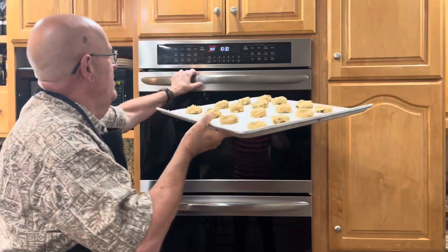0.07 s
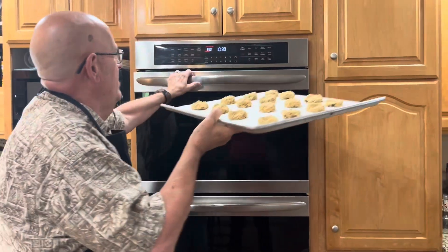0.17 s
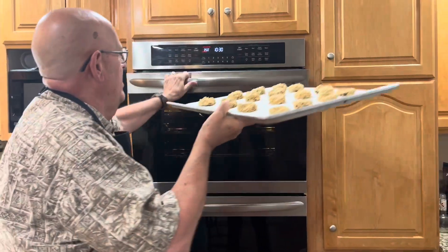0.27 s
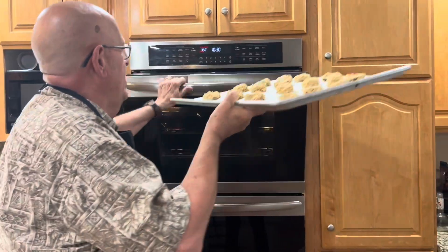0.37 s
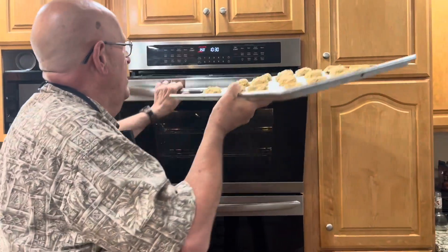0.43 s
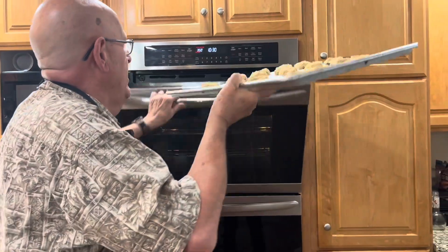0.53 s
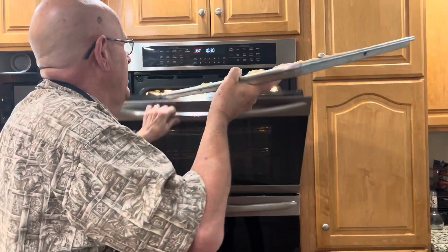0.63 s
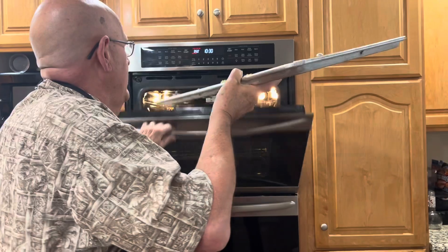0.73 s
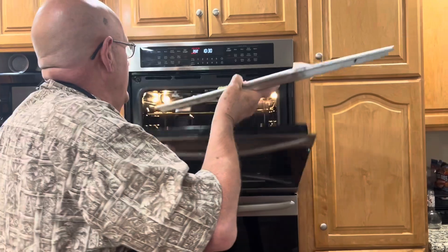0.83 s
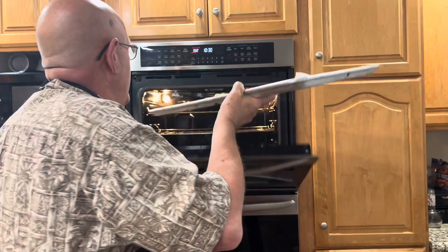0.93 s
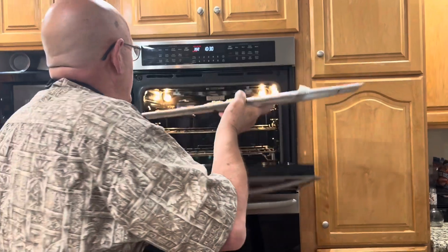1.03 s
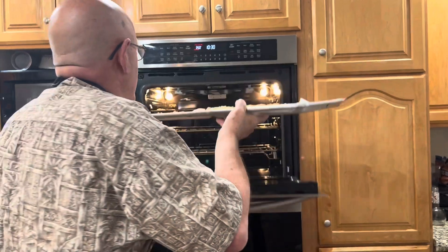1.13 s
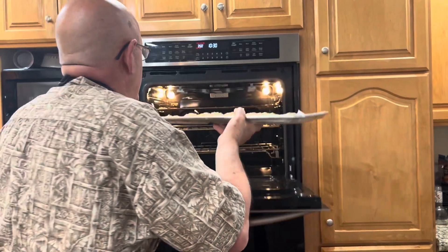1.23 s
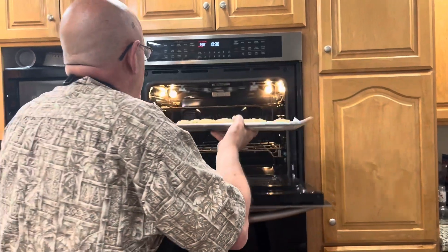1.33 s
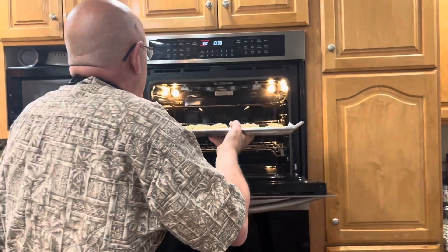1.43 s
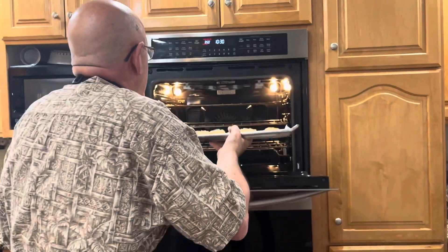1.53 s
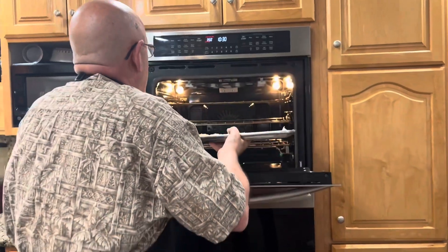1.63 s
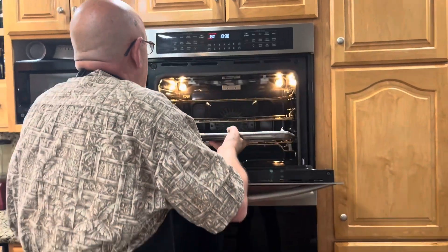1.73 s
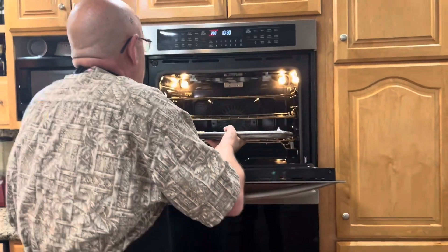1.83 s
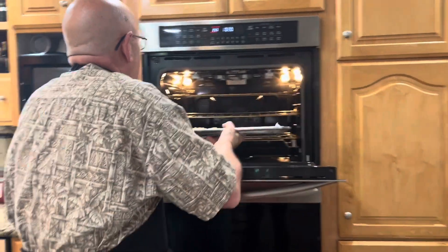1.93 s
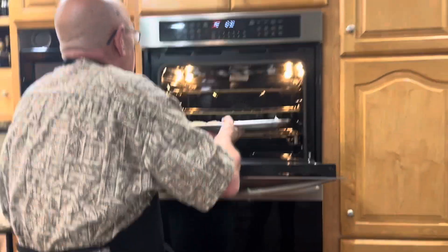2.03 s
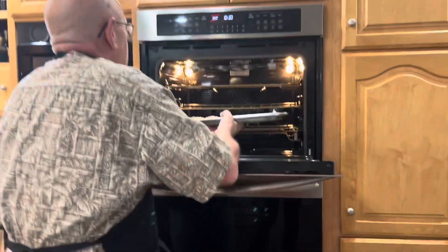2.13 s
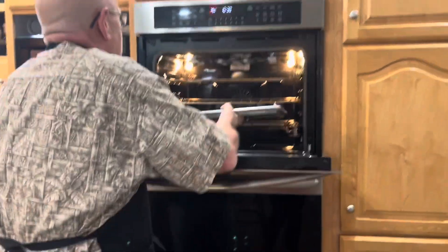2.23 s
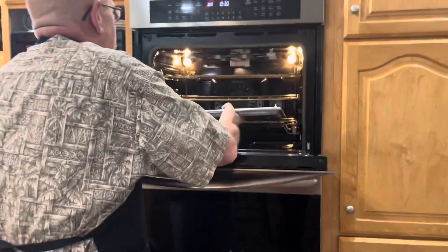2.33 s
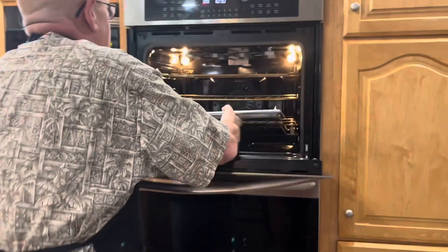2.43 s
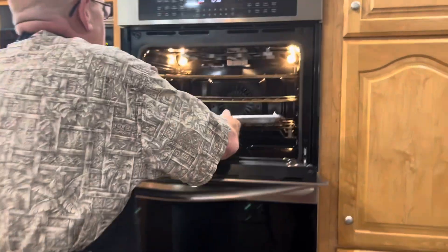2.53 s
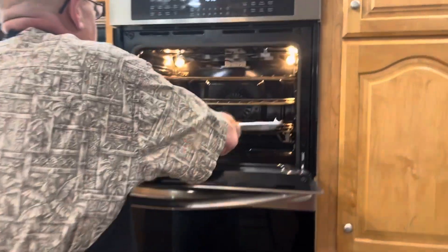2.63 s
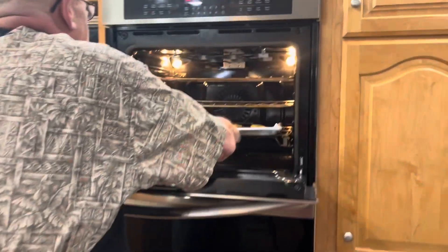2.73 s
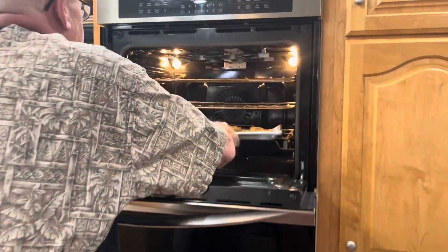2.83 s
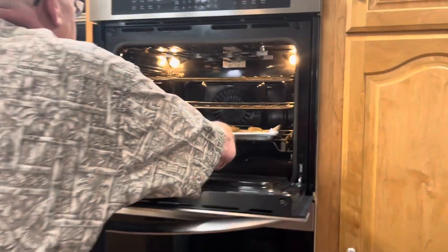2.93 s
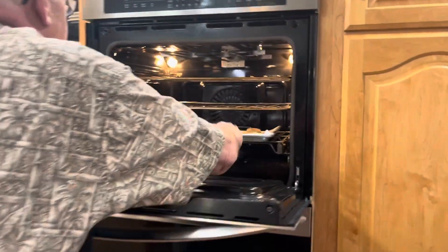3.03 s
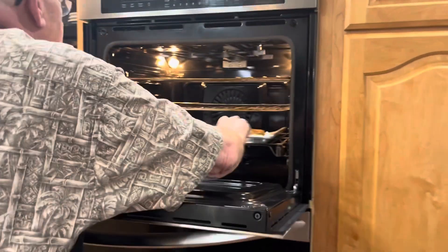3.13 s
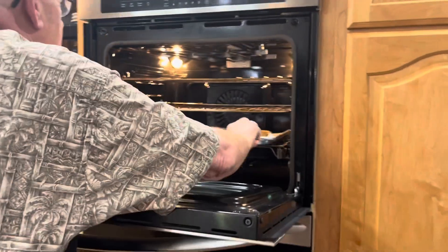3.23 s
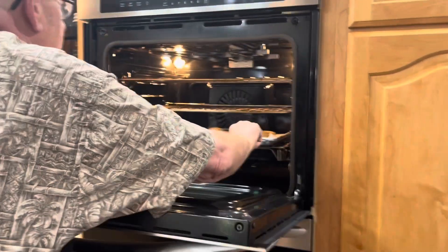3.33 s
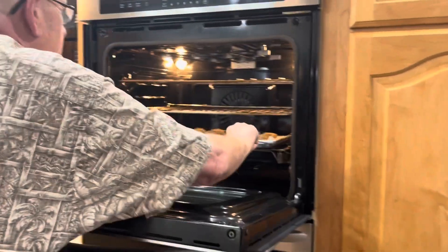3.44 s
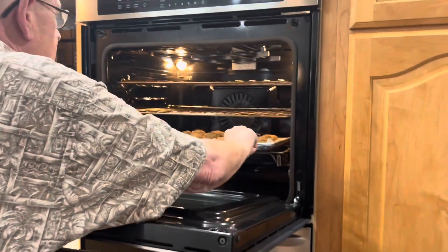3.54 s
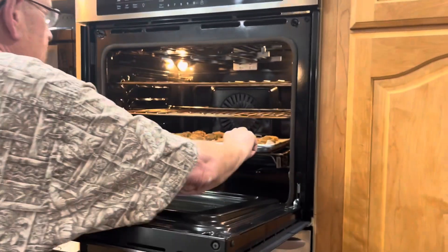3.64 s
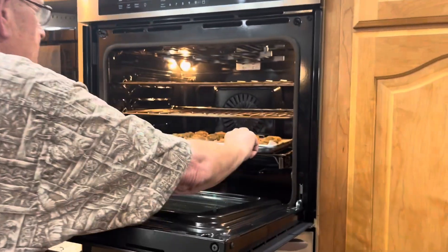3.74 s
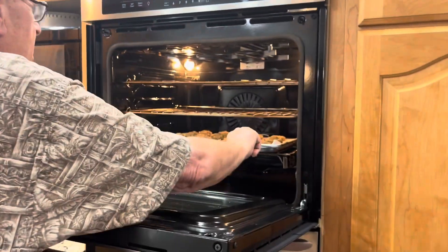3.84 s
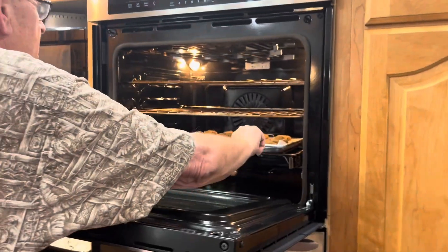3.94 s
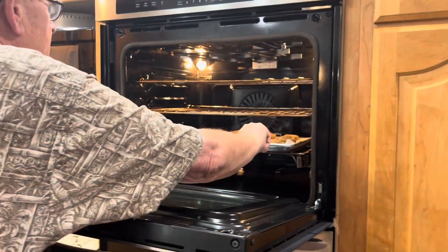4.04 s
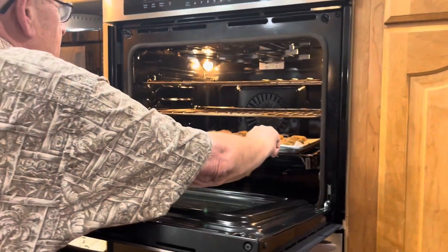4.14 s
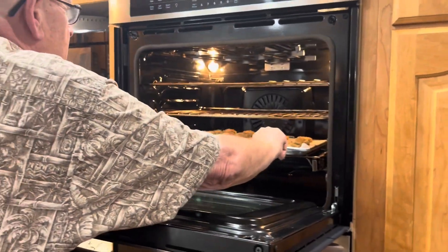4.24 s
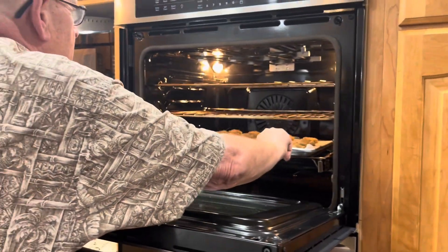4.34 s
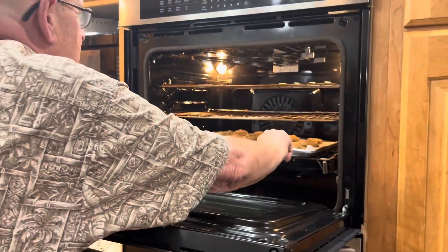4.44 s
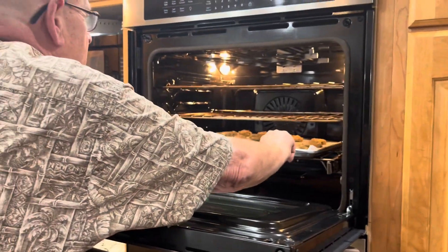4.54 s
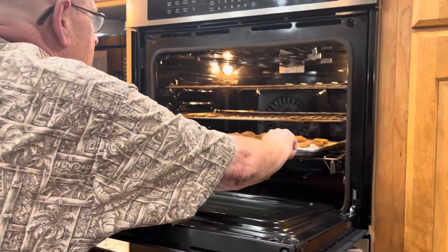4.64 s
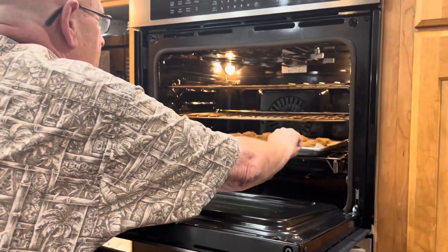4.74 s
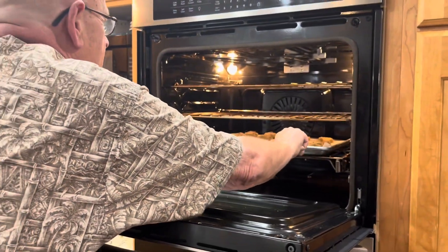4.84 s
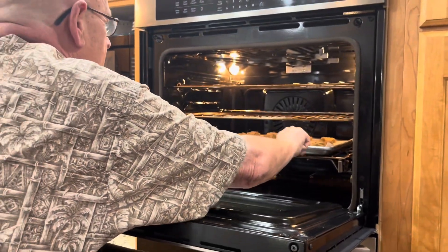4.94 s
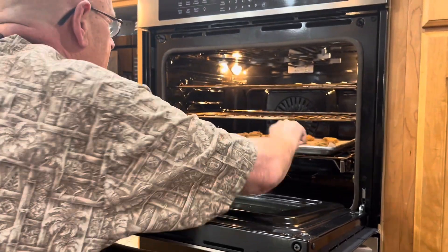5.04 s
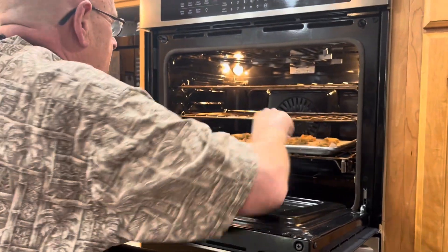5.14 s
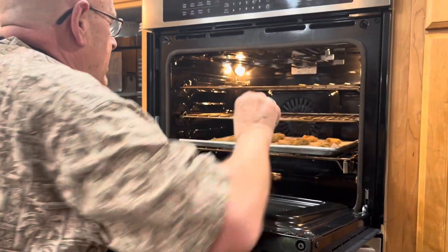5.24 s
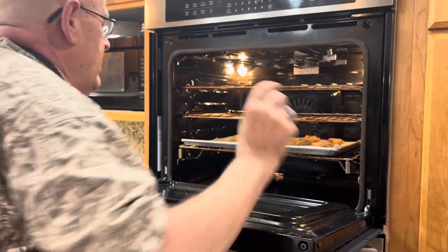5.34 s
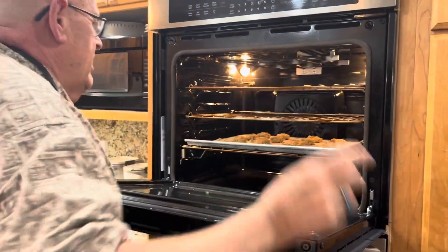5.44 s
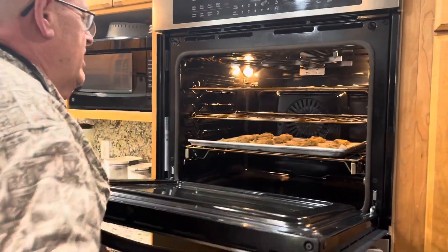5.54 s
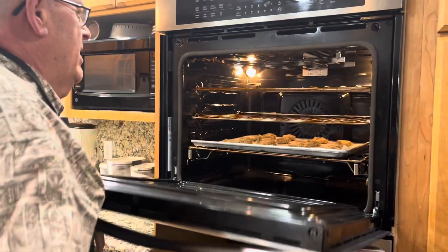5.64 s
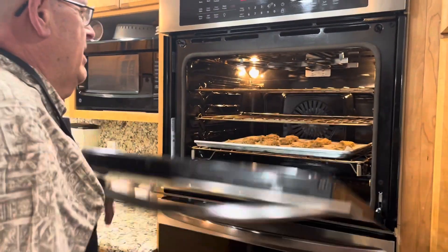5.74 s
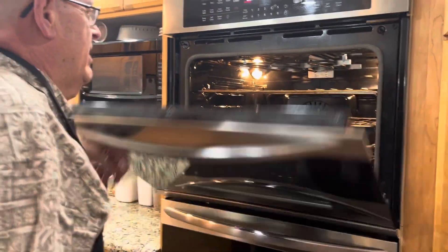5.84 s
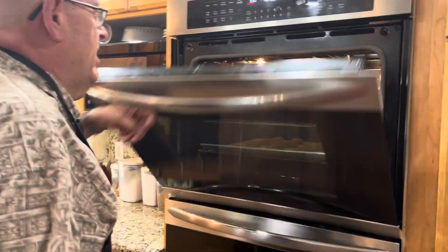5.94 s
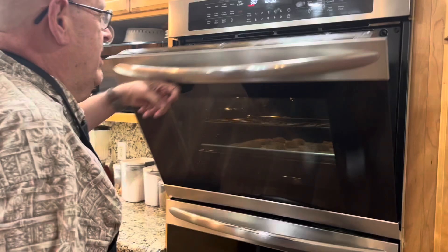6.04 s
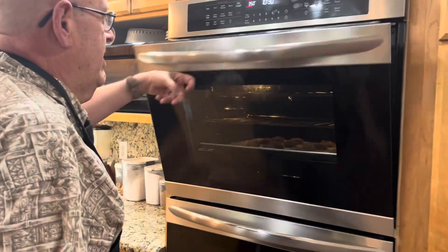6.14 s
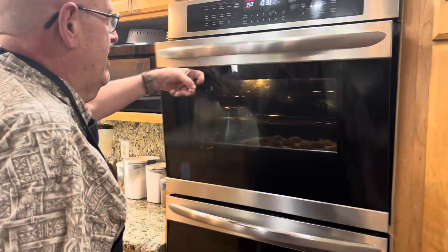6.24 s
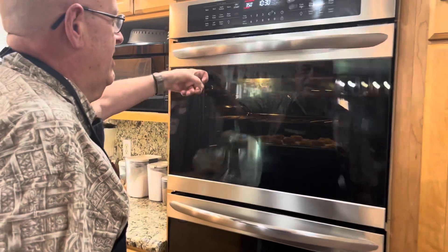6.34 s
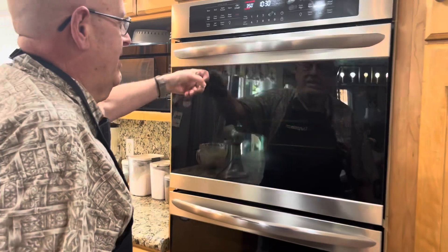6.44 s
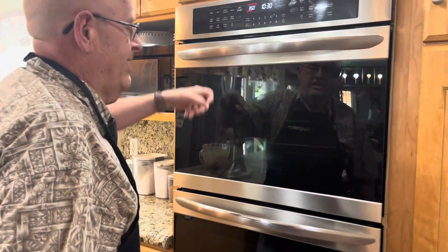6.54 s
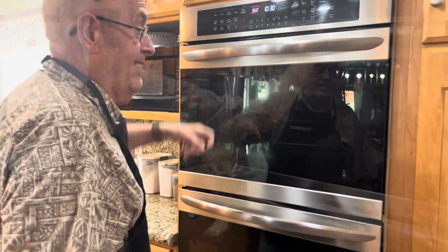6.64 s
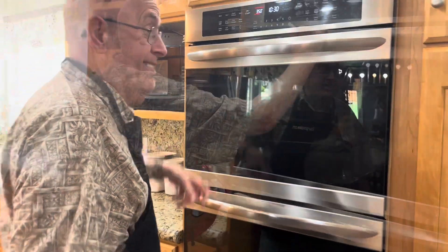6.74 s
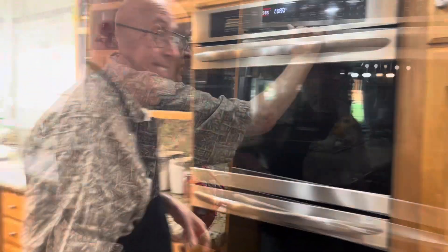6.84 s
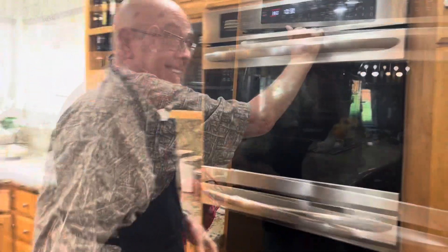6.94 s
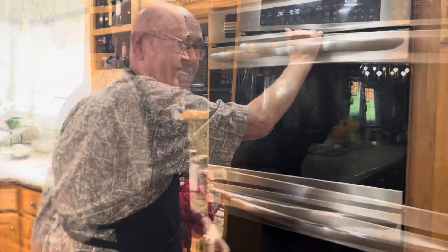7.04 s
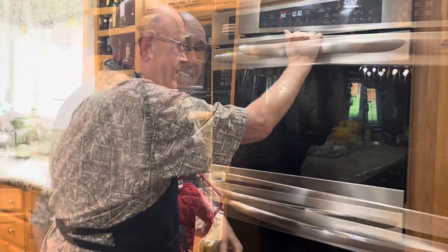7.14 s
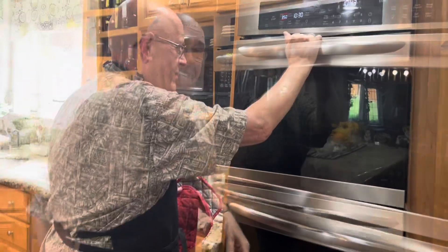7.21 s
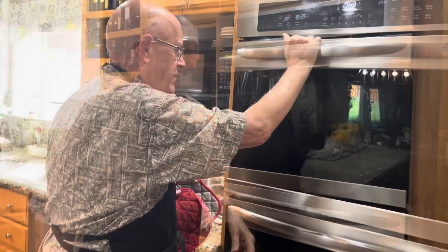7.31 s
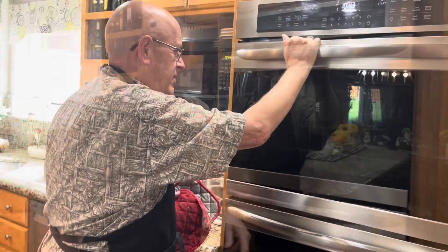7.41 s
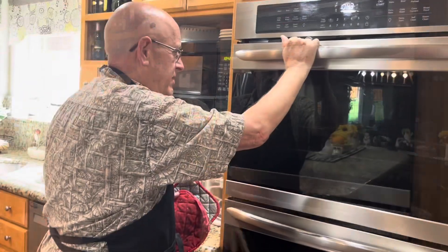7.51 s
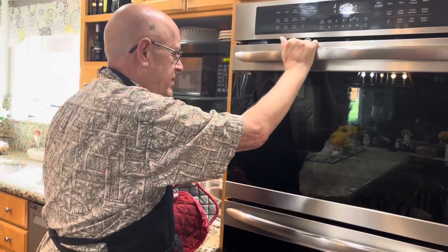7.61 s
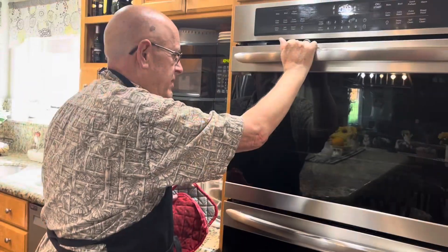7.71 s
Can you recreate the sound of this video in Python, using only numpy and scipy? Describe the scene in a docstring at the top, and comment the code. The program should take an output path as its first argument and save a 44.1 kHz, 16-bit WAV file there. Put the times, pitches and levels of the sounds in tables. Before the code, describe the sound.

A handheld stereo microphone moves nearer to a wall oven. The door is pulled down with faint hinge rumble, a thin spring ring and soft knocks. After a pause, a thin metal tray drops on the rack, rasping and clinking in bursts, with two tiny high squeaks and a loud final clank. The spring catches, the door slams heavily, racks chatter, and low air and faint knocks remain.

```python
"""An oven door is pulled open: handle and stops knock, the hinge spring sings, a sleeve brushes by.
A metal sheet clanks onto the wire rack and is pushed in: random slips rasp, swept tones squeal twice.
The door swings up and slams: coloured noise bursts, ringing modes, a deep thump and a beating boom;
racks chatter and a low gust follows. Throughout, shaped noise and three sines make a cooling fan,
and a two-port microphone hears two blended views of every source."""
import sys
import numpy as np
from scipy import signal
from scipy.fft import rfft, irfft, next_fast_len
from scipy.io import wavfile
from scipy.ndimage import uniform_filter1d

SR = 44100
rng = np.random.default_rng(int(sys.argv[2]) if len(sys.argv) > 2 else 0)


def master_out(mix):
    """Clip the mix to full scale and print it as 16-bit PCM to the path in sys.argv[1]."""
    frames = np.transpose(np.atleast_2d(mix))
    ceiling = np.clip(frames, -1, 1)
    pcm = np.round(ceiling * 32767).astype(np.int16)
    wavfile.write(sys.argv[1], SR, pcm)


N = 342657
TIME = np.arange(N) / SR  # s, whole scene
RING = np.arange(36000) / SR  # s, one ringing blow

# modes of the door and oven box: pitch_hz, level_db, t60_s
DOOR_MODES = [(55.2, -3.5, .3), (80.5, -1, .24), (118.2, -2.5, .26), (143.4, -20.5, 1.3), (165, 4.5, .13),
              (207, -5, .16), (243.8, -5.5, .35), (267.7, 0.5, .32), (318, 2, .3), (362.5, -7, 0.58),
              (393.5, 0, .33), (472, -4, .2), (505, -13, .65), (547, -7, 0.29), (757, -13, 0.34),
              (850, -13, 0.54), (928, -14, .45), (1199, -17.5, 1.28), (1223, -23, 1.2), (1426, -27.5, 1.1),
              (1478, -22, .85), (1561, -29, 1.2), (2228, -30, .9), (2590, -22, .3), (3058, -29, .85),
              (3190, -28, .8)]
# dense ringing of the door: freq_hz, t60_s
DOOR_T60 = [(60, 0.92), (200, 0.55), (600, 0.48), (1500, 0.49), (4000, 0.4), (8000, 0.26), (14000, .22)]
# modes of the sheet and rack: pitch_hz, level_db, t60_s
SHEET_MODES = [(116, -7.5, 0.13), (129, -5, 0.25), (278.6, -8, 0.19), (355.3, -15, 1), (528, -10.5, 0.45),
               (608, -4.5, 0.21), (680, -8, .1), (786.5, -7.5, 0.16), (883, -8.5, 0.16), (1203, -16.5, .3),
               (1400, -12.5, 0.2), (1517, -12.5, 0.51), (1700, -18.5, 0.37), (2445, -18.5, 0.31),
               (3480, -20.5, 0.25), (4160, -17, 0.3), (4260, -16, 0.32), (4790, -18.5, 0.3),
               (5970, -20, 0.25), (6825, -22.5, 0.4), (7330, -21.5, 0.33)]


def amp(db):
    """Decibels to gain."""
    return 10 ** (np.asarray(db) / 20)


def evened(x):
    """Scales to rms 1."""
    return x / np.sqrt(np.mean(x ** 2) + 1e-20)


def read(points, hz):
    """Reads a spectrum table on a log-frequency axis."""
    point_hz, value = np.transpose(points)
    return np.interp(np.log(hz + 1), np.log(point_hz + 1), value)


def level(rows):
    """Gain over time from a (s, dB) curve, silent outside it."""
    s, db = np.transpose(rows)
    return amp(np.interp(TIME, s, db)) * (TIME >= s[0]) * (TIME <= s[-1])


def add(mix, s, sound):
    """Adds a two-channel sound at time s."""
    part = mix[:, max(round(s * SR), 0):][:, :sound.shape[1]]
    part += sound[:, :part.shape[1]]


def shaped(x, gain):
    """Filters by a function of frequency, to rms 1."""
    size = next_fast_len(x.shape[1])
    spectrum = rfft(x, size) * gain(np.fft.rfftfreq(size, 1 / SR))
    return evened(irfft(spectrum, size)[:, :x.shape[1]])


def noise(colour, size=N):
    """Two channels of coloured noise, rms 1."""
    return shaped(rng.standard_normal((2, size)), lambda hz: amp(read(colour, hz)))


def resonances(peaks):
    """Gain function of a few broad resonances (Hz, width Hz, dB), summed in power."""
    def gain(hz):
        power = 0
        for peak_hz, width_hz, db in peaks:
            detuning = (hz ** 2 - peak_hz ** 2) / (width_hz * hz + 1)
            power = power + amp(db) ** 2 / (1 + detuning ** 2)
        return np.sqrt(power)
    return gain


def slips(per_s, spread_db):
    """Random tiny friction slips of very uneven size and either sign."""
    happens = rng.random((2, N)) < per_s / SR
    sign = rng.choice([-1, 1], (2, N))
    return happens * sign * amp(spread_db * np.minimum(rng.exponential(1, (2, N)), 4))


def partials(table):
    """One dying complex sine for each mode."""
    hz, db, t60_s = np.transpose(table)[:, :, None]
    rise = 1 - np.exp(-RING / 0.00033)
    return amp(db) * np.exp((2j * np.pi * hz - np.log(1000) / t60_s) * RING) * rise


def struck(parts, scatter):
    """The modes sounding together; scatter 0-1 varies their phases with the place struck."""
    z = np.exp(2j * np.pi * scatter * rng.random(len(parts))) @ parts
    return np.array([z.imag, z.real])


def dense(colour, decays, crack_s, tail_db, room_db):
    """Countless panel modes: a brief crack, a tail dying band by band, a fainter, longer echo."""
    size = len(RING)
    hz = np.fft.rfftfreq(size, 1 / SR)
    bumps = evened(uniform_filter1d(rng.standard_normal(size // 2 + 1), size=18))
    peaks = evened(amp(4.5 * bumps))  # some modes stand out
    spectrum = rfft(noise(colour, size=size)) * np.where(hz > 600, peaks, 1)
    crack = np.exp(-RING / crack_s)
    out = 0
    for centre_hz, t60_s in decays:
        share = read([(other_hz, other_hz == centre_hz) for other_hz, _ in decays], hz)
        tail = np.exp(-np.log(1000) * RING / t60_s)
        decay = crack + amp(tail_db) * tail + amp(room_db) * np.sqrt(tail)
        out = out + irfft(spectrum * share, size) * decay
    return out * (1 - (RING / RING[-1]) ** 4)


def blow(ring, db, bass_db, treble_db, rise_ms):
    """Hardness and weight of a blow share its energy among bass, body and treble."""
    ring = ring * (1 - np.exp(-(RING * 1000 / max(rise_ms, .2)) ** 2))
    bands = []
    for edge_hz, kind in [(170, "low"), ((200, 2500), "band"), (3200, "high")]:
        bands.append(signal.sosfilt(signal.butter(2, edge_hz, kind, fs=SR, output="sos"), ring))
    bass, body, treble = bands
    bass = bass * (1 - np.exp(-(RING / .02) ** 2))  # heavy parts are slow to get moving
    early = RING < .04
    mix = body / abs(body).max()
    mix = mix - amp(bass_db) * bass / bass[:, early].std()
    mix = mix - amp(treble_db) * treble / treble[:, early].std()
    return amp(db) * mix


def stroke(s, length_s, db, rise_s, sag_db_per_s, release_db_per_s):
    """Gain of one movement: it swells, sags while it lasts, and dies away."""
    t = np.maximum(TIME - s, 0)
    attack = np.sin(np.pi / 2 * np.minimum(t / rise_s, 1)) ** 2
    sag_db = sag_db_per_s * np.minimum(t, length_s)
    release_db = release_db_per_s * np.maximum(t - length_s, 0)
    return attack * amp(db - sag_db - release_db)


def wandering(x, patchy_db):
    """Narrow resonances come and go as the point of contact moves."""
    z = signal.stft(x, nperseg=512, noverlap=384)[2]
    patches = uniform_filter1d(rng.standard_normal(z.shape[1:]), size=3, axis=0)
    patches = evened(uniform_filter1d(patches, size=22, axis=1))
    return evened(signal.istft(z * amp(patchy_db * patches), nperseg=512, noverlap=384)[1][:, :N])


def door_slam(press_s=.058, press_db=5.5, rebound_s=.008, free_db=-1.5, box_hz=150):
    """The door lands in quick blows; its panel thumps, the oven box thuds, the cabinet booms on."""
    # blows of the door on its frame: start_s, rattle_db, tilt_db_per_octave
    blows = [(6.284, -27, -0.5), (6.308, -14, -2), (6.313, -26.5, 3.5), (6.319, -24, 5), (6.342, -28, -1),
             (6.361, -22.5, -3)]
    # dense ringing of the slam before tilt: freq_hz, level_db_per_hz (relative)
    slam_colour = [(25, -10), (60, -5.5), (150, -1.5), (400, 1), (700, -1), (1400, -7), (1900, -12),
                   (2600, -6.5), (4500, -19), (7000, -26.5), (12000, -30), (16000, -41)]
    # close pair of beating cabinet modes: pitch_hz, level_db (relative)
    boom_modes = [(68, -1.5), (82, -1.5)]
    out = np.zeros((2, N))
    for s, rattle_db, tilt_db in blows:
        colour = [(hz, db + tilt_db * np.log2(hz / 1000)) for hz, db in slam_colour]
        rattle = dense(colour, DOOR_T60, crack_s=0.013, tail_db=-9.5, room_db=-18.0)
        add(out, s, amp(rattle_db) * rattle * (1 - np.exp(-RING / 0.0016)))

    # the panel is driven harder while the door presses into the frame, then rings free
    panel = struck(partials([m for m in DOOR_MODES if m[0] > box_hz]), 1.0)
    panel = panel * (1 - np.exp(-RING / .003))
    drive_db = np.interp(RING, [0, press_s, press_s + rebound_s], [0, press_db, free_db])
    add(out, 6.309, panel * amp(-17 + drive_db))

    # the heavy box follows a moment later
    box = struck(partials([m for m in DOOR_MODES if m[0] <= box_hz]), 0)
    add(out, 6.329, amp(-13) * box * (1 - np.exp(-(RING / .007) ** 2)))

    # the door's weight lands as one short, deep thump
    thump_hz, thump_width_s, thump_db = 109.8, .0055, -8.5
    late = TIME - 6.340
    thump = np.sin(2 * np.pi * thump_hz * late) * np.exp(-.5 * (late / thump_width_s) ** 2)
    out[0] += amp(thump_db) * thump

    # the boom swells, sags slowly and is then damped
    boom_s = 6.428
    boom = sum(amp(db) * np.exp(2j * np.pi * hz * (TIME - boom_s)) for hz, db in boom_modes)
    swell = stroke(boom_s, 0.335, -22, rise_s=.13, sag_db_per_s=57, release_db_per_s=352)
    return out + swell * np.array([boom.imag, boom.real])


def sheet_clanks(bass_trim_db=-2, treble_trim_db=-2, modes_db=-8):
    """The sheet drops on the rack, bumps over its wires and hits the stop."""
    # start_s, peak_db, then before trim and relative to the peak bass_db, treble_db; rise_ms
    clanks = [(2.327, -37, -22, -13.5, 6), (2.341, -23, -21, -26, 3), (2.409, -41.5, -1, -1, 4),
              (2.652, -37, -15, -2.5, 5.4), (2.722, -39, -7.5, -4.5, 4.3), (2.805, -42.5, -36, -4.5, 5.9),
              (2.915, -33, -18, -11, 6.6), (3.190, -40, -2.5, -4, 5.5), (3.258, -33, -17, -36, 8.8),
              (3.365, -41.5, -3, -19, 4), (3.409, -24, -10.5, -25.5, 5.4), (3.529, -52, -6, 0.5, 1.4),
              (3.604, -53.5, -1, -2.5, 1.4), (3.908, -47.5, -14.5, -21, 3.5), (4.329, -42, -12, -6, 4),
              (4.59, -31.5, -7, -7, 5.7), (4.699, -16.5, -21.5, -15, 1.3), (4.807, -44.5, -24, -0.5, 2.5),
              (4.964, -37.5, -16, -8, 1.2), (5.032, -40.5, -17, -8.5, 1.7), (5.113, -41, -16, -14, 1.56),
              (5.209, -45, -18, -24, 1)]
    # dense ringing of the sheet: freq_hz, level_db_per_hz (relative)
    sheet_colour = [(25, -11.5), (100, 14), (200, -14), (350, 0), (800, 4), (1500, 4), (2100, -2),
                    (4500, -4.5), (7000, -9.5), (12000, -14.5), (16000, -20)]
    # dense ringing of the sheet: freq_hz, t60_s
    sheet_t60 = [(60, 0.49), (200, 0.77), (600, 0.69), (1500, 0.44), (4000, 0.46), (8000, 0.29),
                 (14000, 0.4)]
    out, parts = np.zeros((2, N)), partials(SHEET_MODES)
    for s, db, bass_db, treble_db, rise_ms in clanks:
        ring = dense(sheet_colour, sheet_t60, crack_s=0.0083, tail_db=-11.5, room_db=-25)
        ring = ring + amp(modes_db) * struck(parts, 0.85)
        add(out, s, blow(ring, db, bass_db + bass_trim_db, treble_db + treble_trim_db, rise_ms))
    return out


def sheet_scrape(rasp_trim_db=-3, ring_trim_db=-7, body_trim_db=-3, rack_trim_db=-3, damped_s=.012):
    """Clumps of slips under the sliding sheet rasp, ring its modes and shake the rack."""
    # pushes along the wires: start_s, length_s, then before trim rasp_db, body_db, rack_db
    pushes = [(2.324, 0.16, -35.5, -41.5, -40), (2.5, 0.18, -57.5, -52.5, -50),
              (2.642, 0.16, -45, -40.5, -40), (2.789, 0.056, -53.5, -43, -43),
              (2.854, 0.055, -44, -38.5, -41.5), (2.9, 0.023, -50.5, -37.5, -50),
              (2.985, 0.15, -56, -52.5, -49), (3.114, 0.062, -45, -47.5, -47), (3.168, 0.21, -52, -45, -43),
              (3.39, 0.036, -49, -42, -41), (3.514, 0.13, -72, -49, -48), (3.878, 0.2, -67.5, -53.5, -50.5),
              (4.329, 0.073, -44.5, -40.5, -37.5), (4.578, 0.055, -57, -47, -38.5),
              (4.71, .04, -51, -46.5, -39)]
    # rasp: freq_hz, level_db_per_hz (relative)
    rasp_colour = [(500, -3.5), (852, -1), (980, -8.5), (1400, -2.5), (2280, -4.5), (4210, -9.5),
                   (7500, -13.5), (9000, -14.5), (12000, -12), (15500, -21)]
    # sheet body resonances: freq_hz, width_hz, level_db (relative)
    body_peaks = [(234, 25, -10), (278, 39, 0), (346, 28, -2.5), (527, 30, -5.5), (800, 70, -19)]
    # rack resonance: freq_hz, width_hz, level_db (relative)
    rack_peaks = [(111.2, 32, 0)]

    judder_db = shaped(rng.standard_normal((1, N)), lambda hz: np.exp(-hz / 60))
    grains = slips(per_s=3000, spread_db=3.5) * amp(judder_db)
    rasp = shaped(grains, lambda hz: amp(read(rasp_colour, hz)) * hz / (hz + 300))
    rasp = wandering(rasp, patchy_db=4)

    pressed = struck(partials([m for m in SHEET_MODES if m[0] > 700]), 1.0)
    pressed = pressed * np.exp(-RING / damped_s)  # the hand damps the sheet
    ring = wandering(signal.fftconvolve(grains, pressed, axes=1)[:, :N], patchy_db=4)

    def rumble(peaks):
        """Sparse slips shake a heavy part, which answers weakly above 1500 Hz."""
        return shaped(slips(per_s=200, spread_db=2),
                      lambda hz: resonances(peaks)(hz) / (1 + (hz / 1500) ** 2))

    slide, flex_power, shake_power = 0, 0, 0
    for s, length_s, rasp_db, body_db, rack_db in pushes:
        sag = 37  # dB/s: each push starts hard and eases
        slide = slide + stroke(s, length_s, rasp_db, 0.018, sag, release_db_per_s=93)
        flex_power = flex_power + stroke(s, length_s, body_db, 0.03, sag, release_db_per_s=100.5) ** 2
        shake_power = shake_power + stroke(s, length_s, rack_db, 0.036, sag, release_db_per_s=84.5) ** 2
    out = slide * (amp(rasp_trim_db) * rasp + amp(ring_trim_db) * ring)
    out = out + amp(body_trim_db) * np.sqrt(flex_power) * rumble(body_peaks)
    return out + amp(rack_trim_db) * np.sqrt(shake_power) * rumble(rack_peaks)


def squeal(s, db, hz, swell_s, fade_s, glide, flutter, second_db=-12, third_db=-13, rough=0.19,
           hiss_db=-22, free_db=-21, ring_cycles=290):
    """Stick-slip slides onto a metal mode, or a harsh combination tone of two, then rings freely."""
    t = np.arange(-.08, .4, 1 / SR)
    wobble, grip, hiss = rng.standard_normal((3, len(t)))
    rub = np.exp(-.5 * (t / np.where(t < 0, swell_s, fade_s)) ** 2)
    slide = glide * (1 - np.tanh(t / 0.0066)) / 2
    bend = slide + flutter * np.sqrt(rub) * evened(uniform_filter1d(wobble, size=70))
    phase = 2 * np.pi * np.cumsum(hz * (1 + bend)) / SR
    tone = 0
    for k, part_db in enumerate([0, second_db, third_db], 1):
        if k * hz < 13000:
            tone = tone + amp(part_db) * np.exp(1j * k * phase)
    # uneven grip and a hiss of friction
    tone = tone * (1 + rough * evened(np.convolve(grip, np.hanning(44), "same")))
    tone = tone + amp(hiss_db) * hiss
    stutter = 1 + .22 * np.cos(2 * np.pi * 90 * t)
    free = (t > 0) * (1 - rub) * np.exp(1j * phase - abs(t) * hz / ring_cycles)
    tone = np.sqrt(2) * amp(db) * (tone * stutter * rub + amp(free_db) * free)
    return s + t[0], np.array([tone.real, 0.33 * tone.imag])


def squeals(echo_db=-10, echo_t60_s=0.43, damping_hz=8000):
    """The squeals echo in the steel oven, which swallows some of their treble."""
    # 11080, 12740 and 7190 Hz are combination tones of two squealing modes:
    # peak_s, level_db, final_pitch_hz, swell_s, fade_s, start_offset (share), flutter (share)
    squeal_rows = [(4.109, -31.5, 4070, 0.011, 0.014, -0.018, .008),
                   (4.099, -47.5, 4730, .009, 0.019, 0.008, .005),
                   (4.349, -30.5, 4740, 0.0035, 0.012, 0.04, 0.0077),
                   (4.374, -34.5, 4722, .006, .022, .01, 0.0062),
                   (4.38, -30, 3980, 0.011, 0.012, 0.0046, .008),
                   (4.368, -36, 11080, .006, 0.0075, 0.004, .012),
                   (4.368, -39.5, 12740, .008, .012, .004, .014),
                   (4.371, -41.5, 7190, 0.006, 0.008, 0.01, .009)]
    out = np.zeros((2, N))
    for row in squeal_rows:
        add(out, *squeal(*row))
    cavity = shaped(rng.standard_normal((2, len(RING))), lambda hz: 1 / np.hypot(1, hz / damping_hz))
    cavity = cavity * np.exp(-np.log(1000) * RING / echo_t60_s)
    cavity = cavity / np.linalg.norm(cavity[0])
    return out + amp(echo_db) * signal.fftconvolve(out[:1], cavity, axes=1)[:, :N]


def wire_song(width_hz=55, trim_db=-7):
    """Rack wires rubbed by the rim ring faintly, each in one narrow, restless mode."""
    # start_s, length_s, pitch_hz, level_db (before trim)
    sings = [(2.366, 0.064, 6821, -45), (2.465, .04, 4220, -48), (2.655, .08, 4260, -41),
             (2.712, .04, 5970, -46), (2.865, 0.065, 4260, -47), (3.19, .09, 6830, -53)]
    a, b = shaped(rng.standard_normal((2, N)), lambda hz: 1 / (1 + (hz / (2 * width_hz)) ** 2))
    tones = 0
    for s, length_s, hz, db in sings:
        gain = stroke(s, length_s, db, rise_s=0.0091, sag_db_per_s=30, release_db_per_s=260)
        tones = tones + gain * np.exp(2j * np.pi * hz * TIME)
    song = tones * (a + 1j * b)
    return amp(trim_db) * np.array([song.real, .5 * song.imag])


def door_knocks(bass_trim_db=-1, treble_trim_db=-2, modes_db=-12):
    """Handle, hinge stops and latch knock on the door; softer contacts last longer."""
    # start_s, peak_db, then before trim and relative to the peak bass_db, treble_db; rise_ms
    knocks = [(0.014, -33.5, -26, -19, 1.6), (0.277, -40.5, -21, -22, 3), (0.443, -35, -11.5, -27, 6),
              (1.017, -41.5, -10, -30, 2), (1.26, -37.5, -6, -15, 1.6), (1.347, -43, -7, -17, 5),
              (1.376, -40.5, -12, -38, 3), (5.548, -31, -20, -9.5, .3), (5.558, -30.5, -14.5, -24.5, .3),
              (5.655, -39.5, -15.5, -38, .4), (6.040, -42.5, -29, -20.5, .8), (6.115, -35, -8, -24.5, 1.2),
              (6.234, -36, -25, -16.5, 1.6), (6.527, -25.5, -3.5, -27, 1.2), (7.442, -52, -12, -34, .7),
              (7.757, -39, -8.5, -31, 1.6)]
    # dense ringing of the door: freq_hz, level_db_per_hz (relative)
    door_colour = [(25, -8), (70, 4), (150, -9), (400, -2), (700, 1.5), (1400, -2.5), (2600, -12),
                   (4500, -19), (7000, -30.5), (12000, -36), (16000, -40)]
    out, parts = np.zeros((2, N)), partials(DOOR_MODES)
    for s, db, bass_db, treble_db, rise_ms in knocks:
        crack_s = 0.012 * np.sqrt(rise_ms)
        ring = dense(door_colour, DOOR_T60, crack_s, tail_db=-8.5, room_db=-27.5)
        ring = ring + amp(modes_db) * struck(parts, 0.89)
        add(out, s, blow(ring, db, bass_db + bass_trim_db, treble_db + treble_trim_db, rise_ms))
    return out


def door_swing(hinge_trim_db=-2):
    """Hinge slips sound the door's panels, the spring grates, and a low gust follows the slam."""
    # the long pull and settling at the stop: start_s, length_s, level_db (before trim), rise_s
    swings = [(0.0, 0.38, -45.5, 0.25), (0.36, 0.34, -47.5, 0.032), (0.72, 0.34, -52, 0.082),
              (1.233, 0.13, -55, 0.0059)]
    # spring catches, once at the open stop and twice as the door lifts: start_s, length_s, level_db, rise_s
    catches = [(1.26, .0094, -42, .0086), (5.506, .021, -40.5, .016), (5.549, .011, -31.5, .006)]
    # hinge resonances: freq_hz, width_hz, level_db (relative)
    hinge_peaks = [(70, 13.5, 5.5), (376, 43, 0), (850, 130, -8.5), (1350, 230, -10.5), (2270, 400, -18.5)]
    # spring resonances: freq_hz, width_hz, level_db (relative)
    spring_peaks = [(890, 90, -2.5), (1280, 130, 3.5), (1570, 110, 5), (1850, 90, 0)]
    # low gust: freq_hz, level_db_per_hz (relative)
    gust_colour = [(20, -26), (45, -4), (75, 3.5), (130, -16.5), (400, -39.5), (1500, -78.5)]
    hinge = shaped(slips(per_s=3300, spread_db=2.5), resonances(hinge_peaks))
    spring = shaped(slips(per_s=1400, spread_db=1.5),
                    lambda hz: resonances(spring_peaks)(hz) / (1 + (hz / 2200) ** 2))
    travel = sum(stroke(*row, sag_db_per_s=9.0, release_db_per_s=63) ** 2 for row in swings) ** .5
    grate = sum(stroke(*row, sag_db_per_s=60, release_db_per_s=600) for row in catches)
    gust = stroke(6.7, 0.074, -45.5, rise_s=.06, sag_db_per_s=3.5, release_db_per_s=100.5)
    return amp(hinge_trim_db) * hinge * travel + spring * grate + noise(gust_colour) * gust


def spring_song(width_hz=16, lower_ratio=.645, lower_db=-5):
    """Hinge slips excite two narrow spring resonances, whose pitch moves with the tension."""
    # the song rises, then sinks and fades as the pull eases: time_s, upper_pitch_hz, level_db
    song = [(0.08, 1400, -73), (0.28, 1408, -54.5), (0.37, 1377, -59), (0.5, 1403, -58), (0.64, 1400, -60),
            (0.74, 1330, -66), (1.15, 1275, -71)]
    s, hz, db = np.transpose(song)
    phase = 2 * np.pi * np.cumsum(np.interp(TIME, s, hz)) / SR
    grains = slips(per_s=400, spread_db=3.0)
    pole = np.exp(-np.pi * width_hz / SR)

    def resonance(turn):
        """Shifts the moving pitch to 0 Hz, low-passes there and shifts back."""
        return evened((turn * signal.lfilter([1 - pole], [1, -pole], grains / turn)).real)

    upper, lower = resonance(np.exp(1j * phase)), resonance(np.exp(1j * lower_ratio * phase))
    return level(np.transpose([s, db])) * (upper + amp(lower_db) * lower)


def rack_rattle(rattle_db=-39, tick_s=0.0078):
    """The slam sets the loose racks chattering against the oven walls."""
    # rack ticks: freq_hz, level_db_per_hz (relative)
    rattle_colour = [(200, -21), (600, 3.5), (1400, 2), (2200, -7), (3400, -3.5), (4500, -17.5),
                     (7000, -26.5), (15000, -40.5)]
    t = np.arange(2000) / SR
    tick = noise(rattle_colour, size=len(t)) * np.exp(-t / tick_s)
    chatter = evened(signal.fftconvolve(slips(per_s=100, spread_db=2), tick, axes=1)[:, :N])
    return chatter * stroke(6.34, .26, rattle_db, rise_s=.02, sag_db_per_s=55, release_db_per_s=79)


def brush(s, db, swell_s, fade_s):
    """Gain of one brush or rustle: it swells to a peak and fades."""
    t = TIME - s
    return amp(db) * np.exp(-np.minimum(abs(t) / np.where(t < 0, swell_s, fade_s), 20))


def sleeve(fizz_hz=7800):
    """Sleeve and hand brush along; one late, dull rustle is the last rattle after the slam."""
    # the row at 6.89 s is that rattle: peak_s, level_db, swell_s, fade_s, fizz_db (gain above fizz_hz)
    brushes = [(0.111, -50, 0.0069, 0.043, -4), (0.282, -62, .004, 0.033, 2),
               (0.765, -47.5, 0.043, 0.087, 8), (0.848, -52.5, 0.0049, 0.017, 17.5),
               (1.02, -62, 0.024, 0.033, -14), (1.9, -73.5, 0.11, 0.13, 4), (6.68, -68, .06, .06, -20),
               (6.89, -68, 0.04, 0.06, -22), (7.16, -69.5, 0.11, 0.051, -2), (7.56, -75, .025, .035, -18)]
    # cloth: freq_hz, level_db_per_hz (relative)
    cloth_colour = [(500, -7), (1500, 1.5), (3000, 7.5), (5500, 7), (8000, -4.5), (11000, 0.5), (13500, -6),
                    (16000, -15.5)]
    cloth = shaped(slips(per_s=7300, spread_db=3), lambda hz: amp(read(cloth_colour, hz)))
    fizz = signal.sosfiltfilt(signal.butter(4, fizz_hz, "high", fs=SR, output="sos"), cloth)
    return sum(brush(*shape) * (cloth + (amp(fizz_db) - 1) * fizz) for *shape, fizz_db in brushes)


def fan(waver=.2):
    """Fan and kitchen air as shaped noise, plus the motor's wavering hum lines."""
    # air: freq_hz, level_db_per_hz (relative)
    air_colour = [(15, -35.5), (25, -17.5), (59, 2), (95, -4), (318, -8), (450, -10.5), (637, -14.5),
                  (691, -13), (1460, -18), (6540, -44), (8100, -50), (9270, -46.5), (11800, -43),
                  (15000, -54.5)]
    # air over time: time_s, level_db
    air_level = [(0, -53), (1.8, -54.5), (4, -53.5), (6, -53.5), (6.9, -52.5), (7.25, -61.5), (7.77, -61)]
    # motor lines before hum_level: pitch_hz, level_db
    hum_lines = [(59.5, -78), (161.5, -60), (323, -73)]
    # hum over time, louder as the microphone comes near: time_s, gain_db
    hum_level = [(0, -23), (2.5, -5), (3.6, 2), (6, 1), (7, -1), (7.77, 0.5)]
    drift = shaped(rng.standard_normal((2, N)), lambda hz: np.exp(-hz / 4))
    hum = 0
    for hz, db in hum_lines:
        phase = 2 * np.pi * (hz * TIME + rng.random()) + waver * drift[1]
        hum = hum + amp(db) * np.sqrt(2) * np.sin(phase)
    hum = level(hum_level) * hum * (1 + waver * drift[0])
    return level(air_level) * noise(air_colour) + hum * np.array([[1], [0]])


def scene():
    """Each source gives two unlike views of itself, which blend into the two microphone ports."""
    # likeness of the ports: freq_hz, likeness (0-1)
    likeness = [(30, .993), (120, .98), (280, .975), (500, .7), (1000, .35), (3000, .4), (6000, .45),
                (8000, .92), (15000, .93)]
    # port phase: freq_hz, left_lead_rad
    port_phase = [(0, 0), (5000, 0), (7000, .9), (8400, np.pi), (9800, 5.0), (12000, 2 * np.pi),
                  (13700, 7.4), (15200, 3 * np.pi)]
    # port balance: freq_hz, left_minus_right_db
    balance = [(100, -0.2), (500, -2), (1200, -1), (2500, 0.5), (4500, 4), (8000, 0), (15000, 0)]
    # microphone response: freq_hz, gain_db
    mic_colour = [(3000, -0.5), (7000, 2), (8300, -3.5), (9800, 0.5), (13500, 0), (15000, -3.5)]
    sources = door_slam() + sheet_clanks() + sheet_scrape() + squeals() + wire_song()
    sources = sources + door_knocks() + door_swing() + spring_song()
    sources = sources + rack_rattle() + sleeve() + fan()
    near, other = rfft(sources, 2 * next_fast_len(N // 2 + SR // 10))
    hz = np.linspace(0, SR / 2, len(near))
    same = np.clip(read(likeness, hz), 0, 1)
    right = same * near + np.sqrt(1 - same ** 2) * other
    right = right * np.exp(-1j * read(port_phase, hz))
    lean = amp(read(balance, hz) / 2)
    return irfft(np.array([near * lean, right / lean]) * amp(read(mic_colour, hz)))[:, :N]


def record(dry, low_cut_hz=36, edge_hz=15850):
    """The recorder's low cut and band limit."""
    dry = signal.sosfilt(signal.butter(2, low_cut_hz, "high", fs=SR, output="sos"), dry)
    band_limit = signal.firwin(511, edge_hz, window=("kaiser", 9), fs=SR)
    return signal.oaconvolve(dry, band_limit[None], "same")


dry = scene()
out = record(dry)
master_out(out)
```